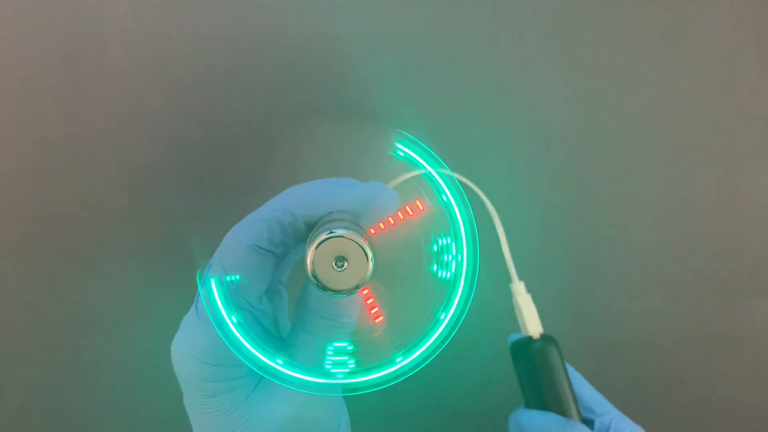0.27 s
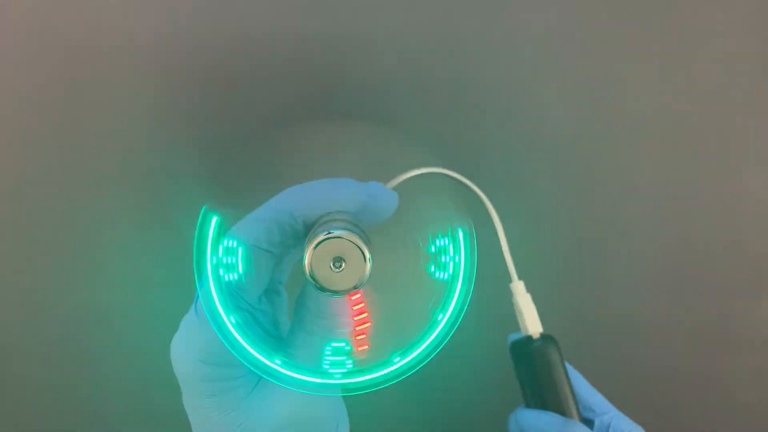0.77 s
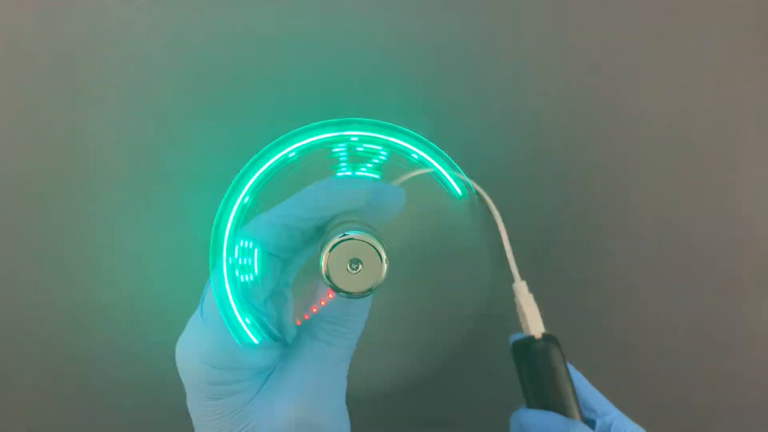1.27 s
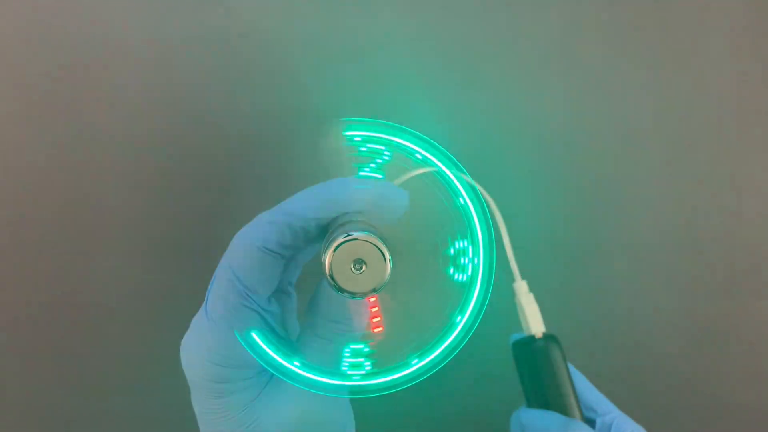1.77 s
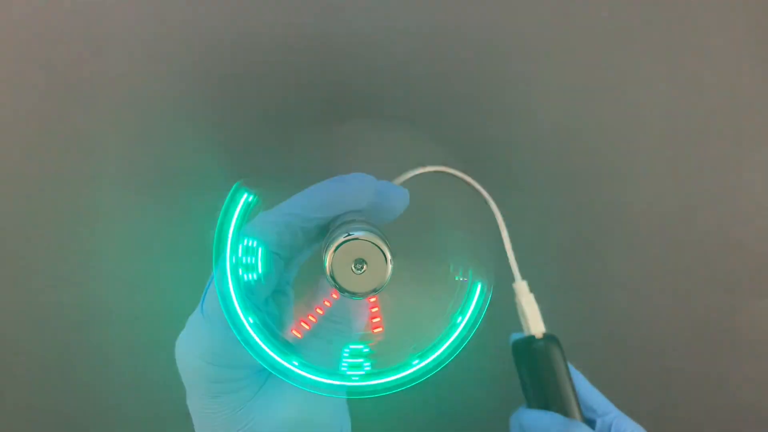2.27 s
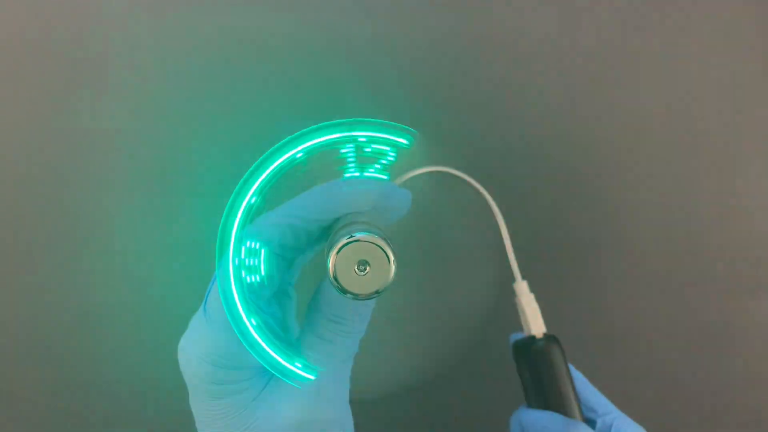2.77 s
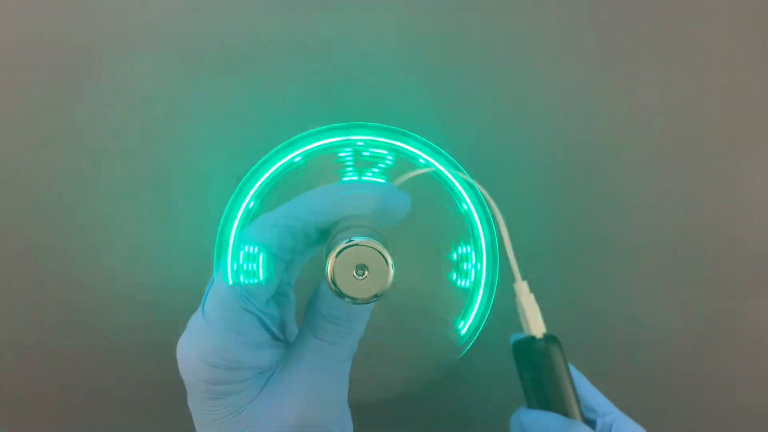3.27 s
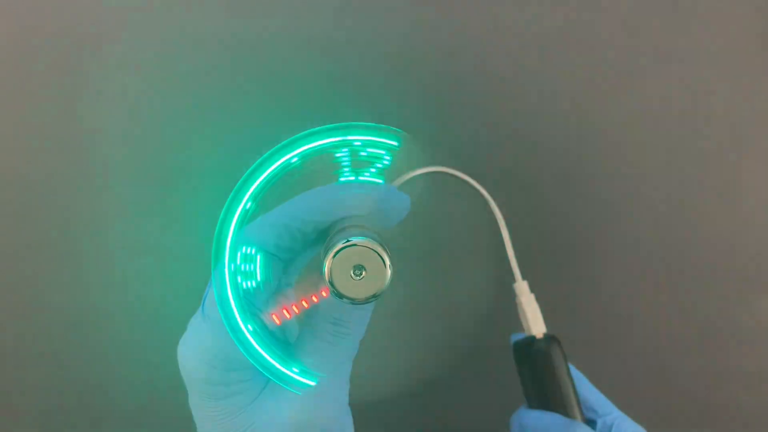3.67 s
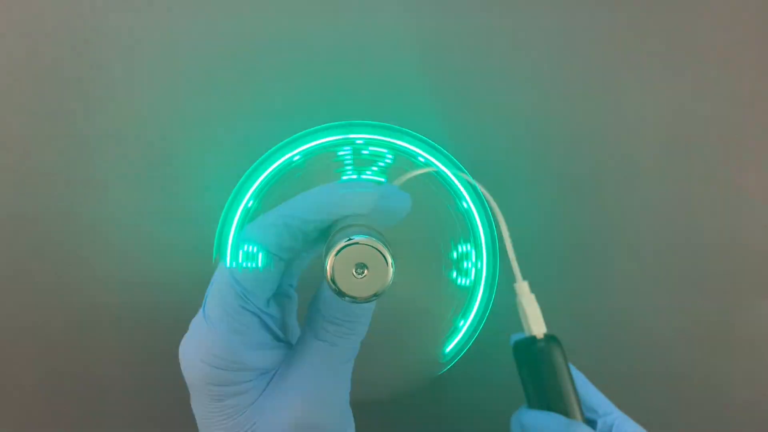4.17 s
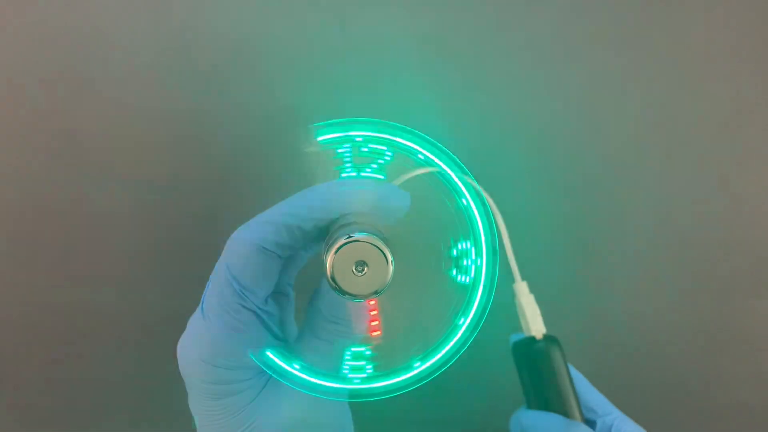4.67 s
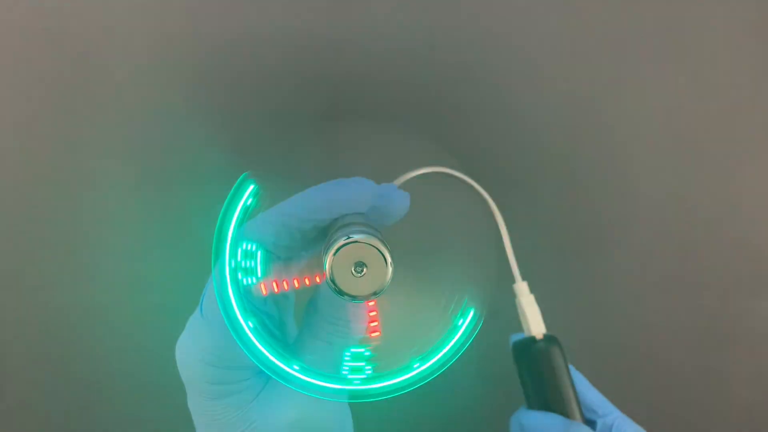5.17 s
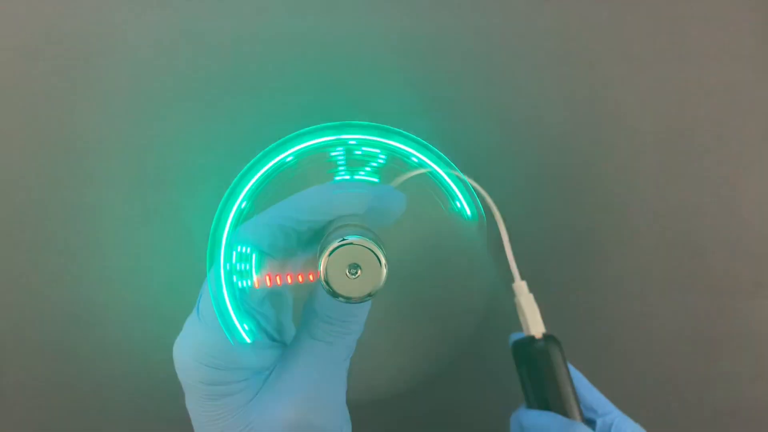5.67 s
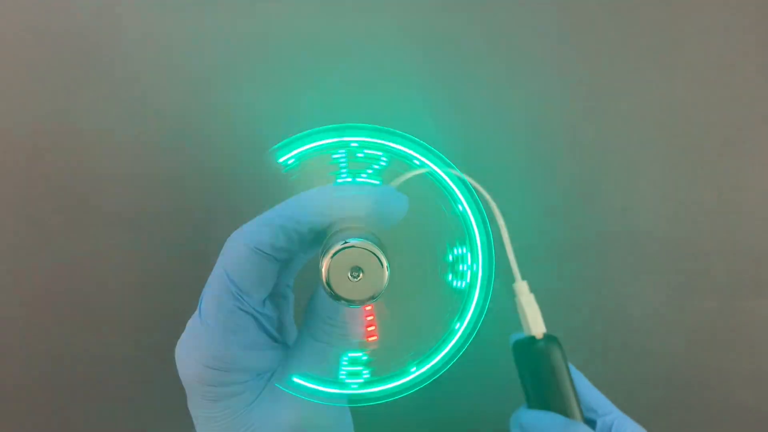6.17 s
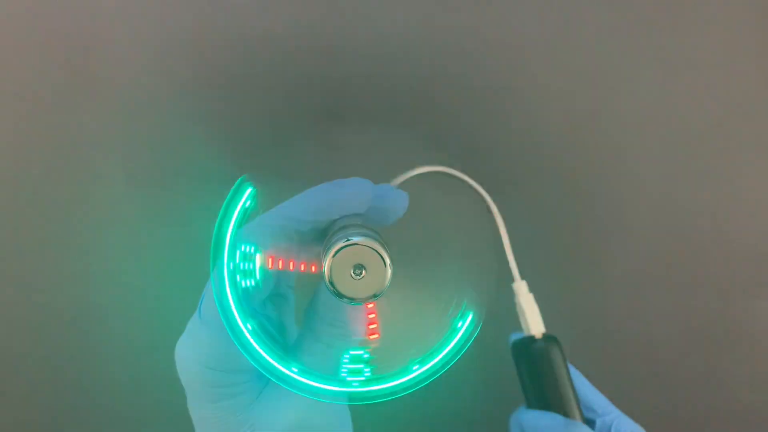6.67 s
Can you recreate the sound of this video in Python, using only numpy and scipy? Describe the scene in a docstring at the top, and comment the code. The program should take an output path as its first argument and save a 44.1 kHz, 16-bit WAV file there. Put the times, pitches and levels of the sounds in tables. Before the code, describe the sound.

A small hand-held electric fan runs close to the microphone for the whole seven seconds. Its motor gives a faint, high whine with a light hum and a fine sizzle, and the blades add a soft rush of air. The draught hits the microphone as a low, fluttering rumble with irregular dull thuds, the strongest near 1.4, 4.1, 4.6 and 5.2 seconds. At about 0.9 seconds a button gives one sharp click, and the whine sags slightly for a second. From 2 seconds to about 6.5, the button is pressed and released nine times, roughly every half second. Each press makes a crisp, bright click, followed about a sixth of a second later by a second click as it springs back. The room is small and dead, with barely any echo. The fan is still running at the end.

```python
"""A small hand-held LED clock fan whines and rumbles as it blows air onto a close microphone.
The motor whines at multiples of its turning speed and sizzles as its brushes spark on the commutator,
the ring of contacts that feeds it. The blades add a soft rush of air. A button clicks: it is let go
once, then pressed and released nine times to set the clock, and each press speeds the motor a little."""
import sys
import numpy as np
from scipy import signal
from scipy.fft import rfft, irfft
from scipy.io import wavfile
from scipy.ndimage import uniform_filter1d, map_coordinates

SR = 44100
rng = np.random.default_rng(int(sys.argv[2]) if len(sys.argv) > 2 else 0)


def wrap_up_sound(samples):
    """Save the sound to the file named by the first command line argument, as 16-bit audio."""
    columns = np.atleast_2d(samples).T
    # keep every value between -1 and 1, then stretch to whole-number steps
    tamed = np.clip(columns, -1, 1)
    steps = np.round(tamed * 32767).astype(np.int16)
    wavfile.write(sys.argv[1], SR, steps)


N = 305833
TIME = np.arange(N) / SR

# motor speed, which sags for a second after the first click: time_s, turns_per_s
SHAFT_SPEED = [(0, 35.766), (0.8, 35.697), (1, 35.045), (1.2, 34.891), (1.48, 34.956), (1.72, 35.263),
               (2, 35.455), (2.45, 35.384), (3.15, 35.512), (3.6, 35.41), (4.25, 35.409), (5.5, 35.2),
               (5.75, 35.289), (6.05, 35.177), (6.25, 35.257), (6.7, 35.101), (6.93, 35.119)]
# strong motor tones: multiple_of_shaft_speed, level_db
STRONG_TONES = [(4, -73), (6, -67), (8, -72), (10, -75), (12, -75), (44, -73), (82, -71), (85, -70),
                (87, -72), (88, -78), (89, -60.5), (90, -71), (91, -72), (92, -72), (93, -66), (96, -67),
                (97, -71), (98, -72), (106, -71), (114, -74), (120, -77), (156, -76), (158, -75),
                (162, -75), (168, -77), (187, -81), (209, -83), (227, -81), (341, -84), (347, -85),
                (359, -85), (377, -84), (382, -85)]
# weaker tones from the brushes: pitch_hz, level_db
BRUSH_TONES = [(300, -81), (700, -92), (1300, -90), (1560, -80), (1900, -88), (2650, -83), (3200, -73),
               (3700, -79), (4550, -91), (5000, -86), (5300, -89), (5650, -83), (6600, -86), (8300, -88),
               (10200, -96), (12200, -94), (14500, -93), (15800, -101)]
# the grip tilts the rotor and moves the brushes' rasp: time_s, centre_hz, lift_db, high_rasp_lift_db
RASP = [(0, 6000, 6, 4), (.85, 6250, 4, 4.5), (1.05, 5600, 6, 8), (1.5, 6150, 1, 4), (1.9, 5830, 6, 1),
        (6.93, 6100, 1.5, 3.5)]
# the grip also turns three tones up or down: time_s, hum_db, main_whine_db, upper_whine_db
GRIP_SHIFTS = [(0, -6, -1.5, 0), (.85, -9, -2, -8), (1.05, -5, -4.5, 4.5), (1.55, -6, -2, 5.5),
               (2.1, 0, -2.5, -1), (6.93, 1, -1.5, -0.5)]
# tone colour of the sparks: pitch_hz, level_db
SPARK_COLOUR = [(3000, -30), (7500, -1), (10500, -4.5), (13500, 1), (16000, -1)]
# tone colour of the air leaving the blades: pitch_hz, level_db
RUSH_COLOUR = [(100, -10), (250, -12), (400, -14.5), (570, -15.5), (670, -19.5), (900, -15), (1250, -18),
               (1520, -16.8), (1800, -20.5), (2400, -18), (2900, -21), (3300, -19.5), (4000, -28),
               (4800, -30.5), (5900, -30), (8200, -34), (10200, -39), (14000, -39), (16000, -43)]
# strength of the draught on the microphone: time_s, level_db
DRAUGHT_STRENGTH = [(0, -27.5), (0.65, -20), (0.9, -26.5), (1.15, -22), (2.1, -19.5), (3.3, -21.5),
                    (3.8, -20), (4.45, -22.9), (5.1, -18), (5.55, -24.5), (6.1, -21), (6.93, -24)]
# tone colour of the swirls in the draught: pitch_hz, level_db
SWIRL_COLOUR = [(5, -14), (14, 6), (24, 3.5), (36, -1), (50, -8.5), (70, -16), (100, -31), (150, -37.5),
                (220, -55), (400, -78), (1000, -110)]
# hard puffs of air: time_s, level_db, half_length_s
PUFFS = [(1.135, -26, 0.056), (1.23, -28, 0.024), (1.368, -18.5, 0.01), (1.467, -17, 0.0056),
         (1.622, -24.5, 0.023), (1.827, -32, 0.038), (2.031, -26, 0.019), (2.386, -34, 0.017),
         (2.596, -26, 0.026), (3.185, -23.5, 0.02), (3.36, -24, 0.022), (3.781, -30, 0.025),
         (4.104, -19, 0.012), (4.603, -18.5, 0.024), (5.038, -24.5, 0.017), (5.157, -16.5, 0.0082)]
# tone colour of a puff: pitch_hz, level_db
PUFF_COLOUR = [(20, 2.5), (55, 7.5), (85, 3), (130, -27), (200, -28.5), (500, -78), (2000, -140)]
# button going down: start_s, level_db
PRESSES = [(2.0348, -34), (2.5985, -34), (3.1414, -34.5), (3.7061, -34.5), (4.2331, -34.5), (4.7447, -33.5),
           (5.278, -34.5), (5.7444, -35), (6.3898, -34)]
# button springing back: start_s, level_db
RELEASES = [(.889, -33), (2.1907, -32.5), (2.756, -33.5), (3.3215, -33.5), (3.8599, -34.5), (4.4199, -33.5),
            (4.9271, -33.5), (5.4359, -33), (5.8913, -34), (6.5457, -33)]
# tones at which the housing rings: pitch_hz, press_db, release_db
HOUSING_TONES = [(942, -8.0, -4.0), (1157, -10.0, -5.0), (1345, -8.0, -4.0), (1614, -6.0, -2.0),
                 (1798, -8.0, -4.0), (2077, -7.0, -5.0), (2271, -5.0, -3.0), (2427, -5.0, -5.0),
                 (3176, -5.0, -2.0), (3402, -6.0, -3.0), (3746, -7.0, -7.0), (3989, -8.0, -12.0),
                 (4285, -11.0, -11.0), (4435, -12.0, -12.0), (4871, -7.0, -6.0), (5076, -8.0, -4.0),
                 (5307, -9.0, -4.0), (5953, -4.0, -7.0), (6422, -6.0, -3.0), (6664, -9.0, -5.0),
                 (6847, -5.0, -11.0), (7105, -1.0, -7.0), (7450, 0.0, -12.0), (7789, -1.0, -11.0),
                 (8064, -3.0, -13.0), (8397, -4.0, -12.0), (8807, -8.0, -13.0), (9350, -8.0, -15.0)]
# tone colour of the button's snapping metal dome: pitch_hz, press_db, release_db
SNAP_COLOUR = [(200, -25, -54), (553, -7, -9), (1000, 2.5, 12), (2300, 4.5, 5.5), (5300, -4, 6.5),
               (8000, 7.5, 3), (9000, 0.5, -9), (11000, -6.5, -10), (13800, -9.5, -6), (16000, -19, -16)]
# time the room's echo takes to fade by 60 db: pitch_hz, fade_s
ROOM_FADE = [(300, .16), (2000, .15), (7000, .125), (10000, .1), (15000, .09)]


def motor(high_rasp_hz=7350, high_width_hz=450, rasp_width_hz=330, size=4096, count=450):
    """The brushes scrape nearly the same pattern on every turn; it drifts as the hand moves."""
    turns, multiples = shaft_turns(), np.arange(count)
    shape = (int(turns[-1]) + 2, count)  # a row for each turn, a column for each tone
    hz = multiples * turns[-1] / TIME[-1]
    turn_s = np.interp(np.arange(shape[0]), turns, TIME)
    rasp_s, *columns = np.transpose(RASP)
    rasp_hz, rasp_db, high_db = (np.interp(turn_s, rasp_s, c)[:, None] for c in columns)
    # neighbouring tones stand out or sink in small groups, more so in the treble
    groups = np.clip(unit_level(uniform_filter1d(rng.standard_normal(count), 3)), -2, 2)
    level_db = look_up(BRUSH_TONES, hz) + np.interp(hz, [3500, 8000], [1.5, 3.5]) * (groups - .3)
    level_db = level_db + rasp_db * bell(hz, rasp_hz, rasp_width_hz)
    level_db += high_db * bell(hz, high_rasp_hz, high_width_hz)
    wobble = np.full(count, .3)
    for multiple, db in STRONG_TONES:
        level_db[:, multiple], wobble[multiple] = db, .2  # strong tones are steadier
    grip_s, *shifts_db = np.transpose(GRIP_SHIFTS)
    for multiple, shift_db in zip((6, 89, 93), shifts_db):  # hum, main whine, upper whine
        level_db[:, multiple] += np.interp(turn_s, grip_s, shift_db)
    smoothing = signal.windows.hann(71)[:, None]
    drift = unit_level(signal.fftconvolve(complex_noise(shape), smoothing, "same", axes=0))
    steady = np.exp(2j * np.pi * rng.random(count))
    scrape = steady + wobble * (drift + .17 * complex_noise(shape))
    # the scrape swells once a turn and bursts twelve times, as the brushes cross the commutator gaps
    angle = 2 * np.pi * np.arange(size) / size
    contact = unit_level(np.exp(.12 * np.cos(angle) + .45 * np.cos(12 * angle)))
    phase = np.angle(rfft(irfft(scrape, size) * contact)[:, :count])
    tones = abs(scrape) * np.exp(1j * phase) * gain_of(level_db) * (multiples > 1)
    turn_waves = irfft(tones, size) * size / np.sqrt(2)
    # play each turn's wave at the speed of the shaft
    return map_coordinates(turn_waves, [turns, turns % 1 * size], order=1, mode="grid-wrap")


def shaft_turns(extra_turns_per_s=.15, spin_up_s=.06):
    """Counts the turns so far. A held button speeds the shaft up, and its weight smooths the change."""
    held = np.zeros(N)
    for start, _ in PRESSES:
        end = min(s for s, _ in RELEASES if s > start)
        held[round(start * SR):round(end * SR)] = 1
    lag = np.exp(-1 / (spin_up_s * SR))
    boost = extra_turns_per_s * signal.lfilter([1 - lag], [1, -lag], held)
    return np.cumsum(np.interp(TIME, *np.transpose(SHAFT_SPEED)) + boost) / SR


def sparks(per_turn=6, fade_turns=0.036, spread_db=7, level_db=-71.5, size=1250):
    """Each commutator gap sparks with a tiny tick, much the same on every turn: a fine, even sizzle."""
    turns = shaft_turns()
    gaps = per_turn * turns
    gap_db = spread_db * rng.standard_normal(per_turn)
    fade = np.exp(-(gaps % 1) / (per_turn * fade_turns))
    ticks = gain_of(gap_db[gaps.astype(int) % per_turn]) * fade
    repeating = map_coordinates(rng.standard_normal(size), [turns % 1 * size], order=3, mode="grid-wrap")
    crackle = repeating + .7 * rng.standard_normal(N)
    return gain_of(level_db) * unit_level(coloured(ticks * crackle, SPARK_COLOUR))


def blades(swell_db=2.5, level_db=-55.5):
    """Air rushes off the blades and swells once a turn as they sweep past the microphone."""
    swell = gain_of(swell_db * np.cos(2 * np.pi * shaft_turns()))
    return gain_of(level_db) * unit_level(coloured(rng.standard_normal(N) * swell, RUSH_COLOUR))


def draught(split_hz=75, slow_db=-1.0, fast_db=-23, surge_db=4.5, surge_s=0.04, size=2600):
    """Big slow swirls of air and small fast ones rumble on the microphone, each with its own flutter."""
    strength_db = np.interp(TIME, *np.transpose(DRAUGHT_STRENGTH))
    surges = sum(bell(TIME, s, surge_s) for s, _, _ in PUFFS)  # slow swirls swell around every puff
    slow_gust_db = slow_db + surge_db * surges + 2.5 * flutter()
    fast_gust_db = fast_db + 2.0 * flutter()
    air = coloured(rng.standard_normal(N), SWIRL_COLOUR)
    slow = signal.sosfiltfilt(signal.butter(4, split_hz, fs=SR, output="sos"), air)
    out = np.zeros(N)
    for swirls, gust_db in ((slow, slow_gust_db), (air - slow, fast_gust_db)):
        power = uniform_filter1d(uniform_filter1d(swirls ** 2, size), size)
        out += swirls / np.sqrt(power) * gain_of(strength_db + gust_db)
    return out


def puffs(size=8192):
    """Now and then one swirl hits the microphone's opening squarely with a dull thud."""
    t, out = (np.arange(size) - size / 2) / SR, np.zeros(N)
    for s, db, half_length_s in PUFFS:
        swell = bell(t, 0, half_length_s)
        thud = unit_level(coloured(rng.standard_normal(size), PUFF_COLOUR) * swell)
        add(out, s + t[0], gain_of(db) * thud * np.sqrt(np.mean(swell ** 2)))
    return out


def button(strokes, column, ring_db, snap_db, ring_s=0.032, crack_s=0.0053, rattle_s=.06, size=6000):
    """The metal dome snaps over much the same way each time, rattles briefly and rings the housing."""
    t, tones = np.arange(size) / SR, np.array(HOUSING_TONES)
    fade = fade_out(t, rattle_s) + 0.3 * fade_out(t, crack_s)
    dome, out = rng.standard_normal(size), np.zeros(N)
    for s, stroke_db in strokes:
        # each click rings at very slightly different, random pitches
        hz = tones[:, :1] * (1 + .004 * rng.standard_normal((len(tones), 1)))
        waves = np.sin(2 * np.pi * (hz * t + rng.random(hz.shape)))
        ring = unit_level(gain_of(tones[:, column]) @ waves) * fade_out(t, ring_s)
        rattle = rfft(fade * (dome + .5 * rng.standard_normal(size)), 2 * size)
        toneless = irfft(rattle / abs(rattle))  # the snap has no pitch of its own
        snap = unit_level(coloured(toneless, SNAP_COLOUR, column)[:size])
        add(out, s, gain_of(stroke_db) * (gain_of(ring_db) * ring + gain_of(snap_db) * snap))
    return out


def room(x, delay_s=0.00088, size=12000):
    """A small, dead room adds a short echo with no pitch of its own; the treble fades soonest."""
    hz, t, bands = signal.stft(rng.standard_normal(size), SR, nperseg=256)
    bands = bands * fade_out(t, look_up(ROOM_FADE, hz)[:, None])
    spectrum = rfft(signal.istft(bands, SR, nperseg=256)[1], 2 * size)
    echo = irfft(spectrum / abs(spectrum))[:size] * (np.arange(size) > delay_s * SR)
    return signal.fftconvolve(x, echo / np.linalg.norm(echo))[:N]


def gain_of(db):
    """Turns decibels into a number to multiply by."""
    return 10 ** (np.asarray(db) / 20)


def fade_out(t, fade_s):
    """Falls by 60 decibels every fade_s seconds."""
    return gain_of(-60 * t / fade_s)


def unit_level(x):
    """Scales x to an average (rms) level of 1."""
    return x / np.sqrt(np.mean(abs(x) ** 2) + 1e-20)


def bell(x, centre, width):
    """A bell curve of height 1."""
    return np.exp(-((x - centre) / width) ** 2)


def look_up(points, hz, column=1):
    """Reads between a table's rows, with pitch spaced in octaves."""
    table = np.transpose(points)
    return np.interp(np.log(hz + 1), np.log(table[0] + 1), table[column])


def coloured(x, points, column=1):
    """Turns each pitch in x up or down as a table says."""
    hz = np.fft.rfftfreq(len(x), 1 / SR)
    return irfft(rfft(x) * gain_of(look_up(points, hz, column)), len(x))


def complex_noise(shape):
    """Random sizes and phases (starting points) for waves."""
    return unit_level(rng.standard_normal(shape) + 1j * rng.standard_normal(shape))


def flutter(rate_hz=8):
    """A random wobble at about the given rate."""
    hz = np.fft.rfftfreq(N, 1 / SR)
    return unit_level(irfft(rfft(rng.standard_normal(N)) * bell(hz, rate_hz, rate_hz / 2), N))


def add(mix, start_s, sound):
    """Mixes a sound in at start_s."""
    part = mix[round(start_s * SR):][:len(sound)]
    part += sound[:len(part)]


def scene():
    """Fan, draught and button, close to one microphone; only the clicks echo."""
    clicks = button(PRESSES, column=1, ring_db=7.5, snap_db=-16.5)
    clicks += button(RELEASES, column=2, ring_db=6, snap_db=-19.5)
    fan = motor() + sparks() + blades() + draught() + puffs()
    return (fan + clicks + gain_of(-7.5) * room(clicks))[None]


def record(dry):
    """Cuts the highest treble, above 15750 Hz."""
    treble_cut = signal.firwin(511, 15750, window=("kaiser", 9), fs=SR)
    return signal.oaconvolve(dry, treble_cut[None], "same")


dry = scene()
out = record(dry)
wrap_up_sound(out)
```